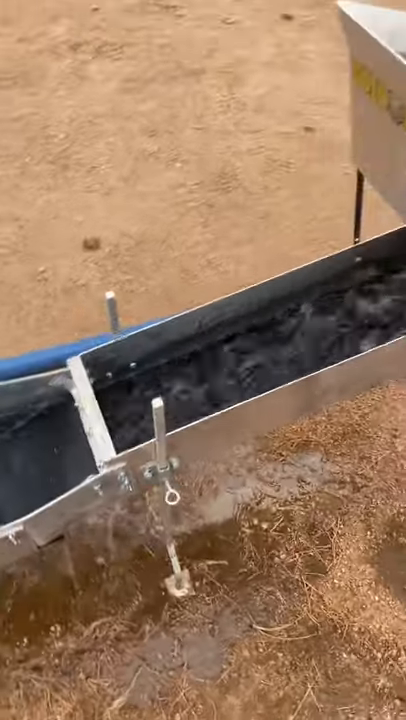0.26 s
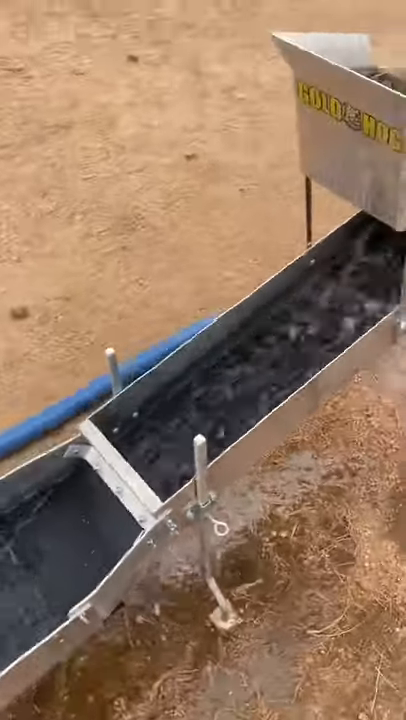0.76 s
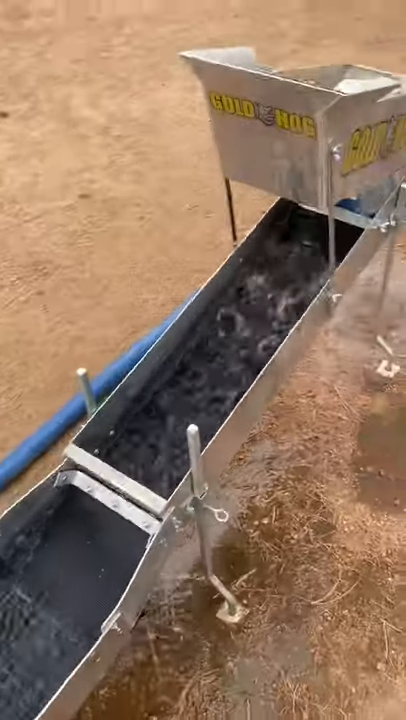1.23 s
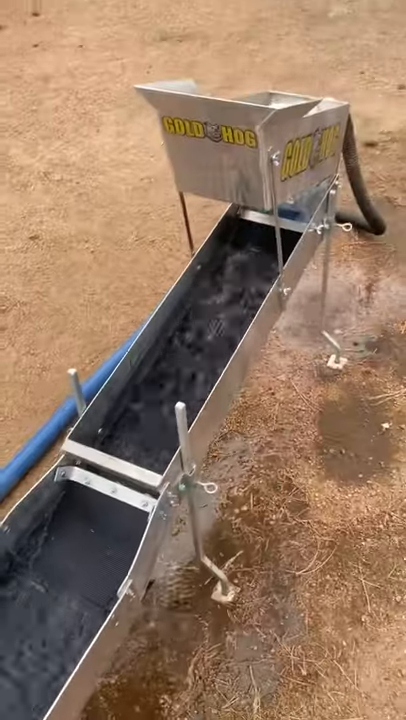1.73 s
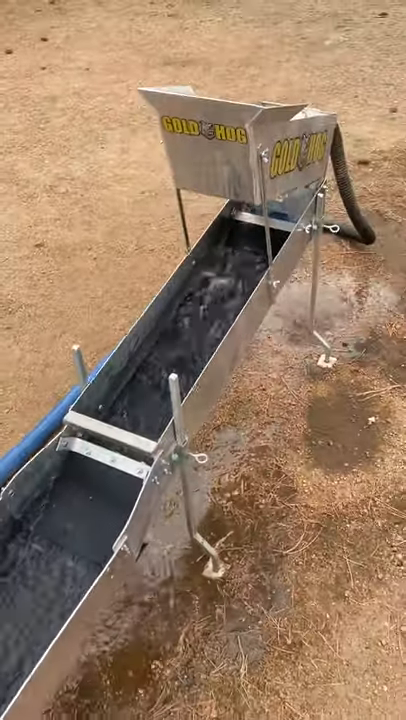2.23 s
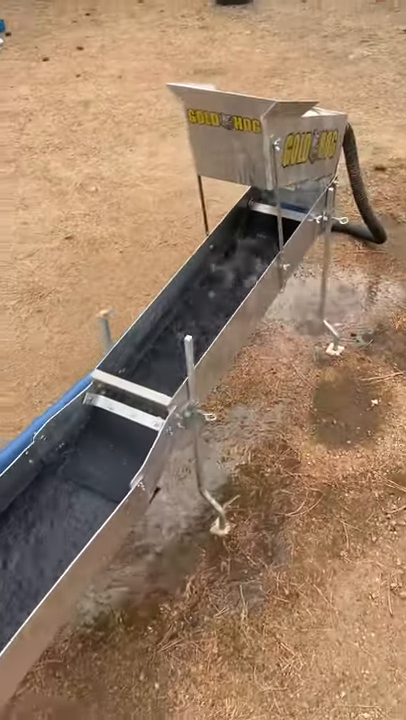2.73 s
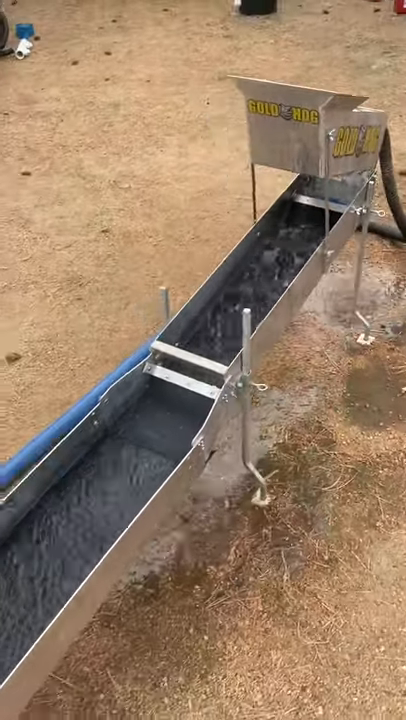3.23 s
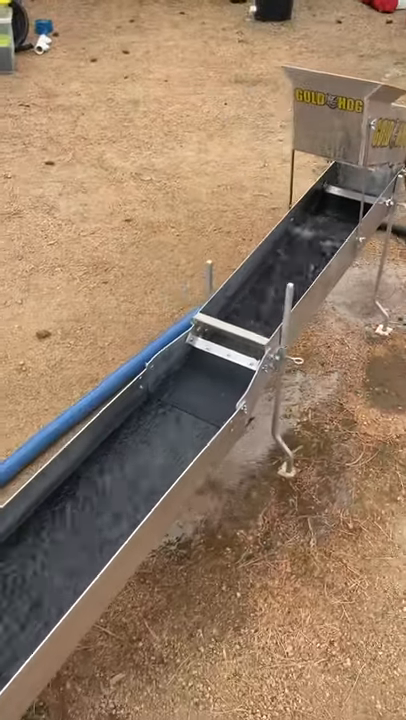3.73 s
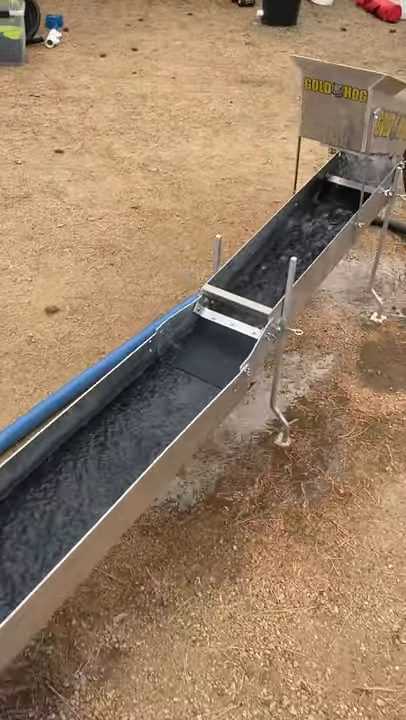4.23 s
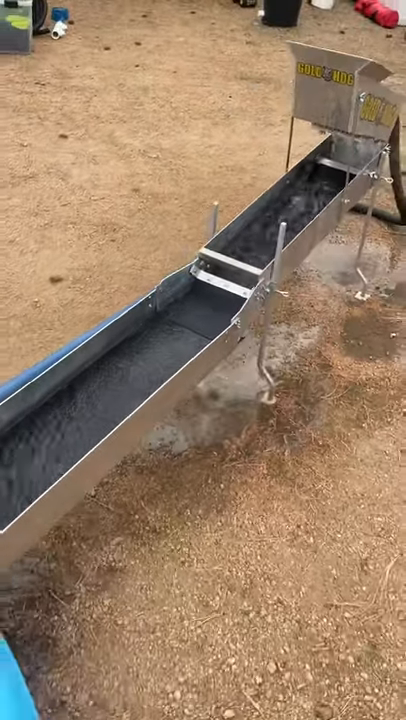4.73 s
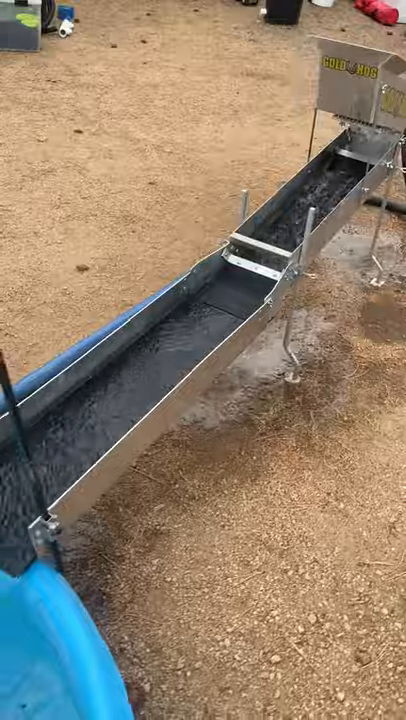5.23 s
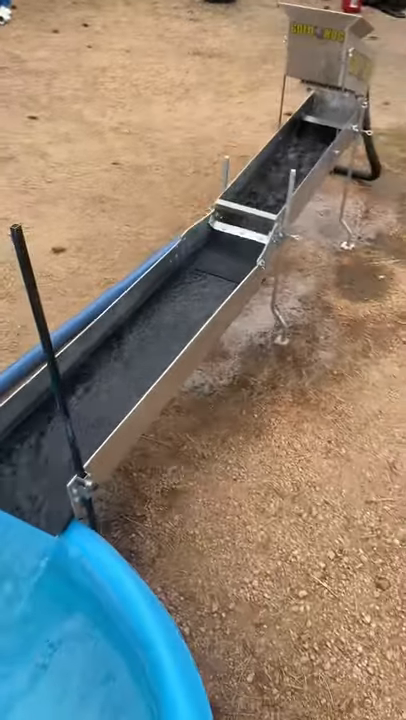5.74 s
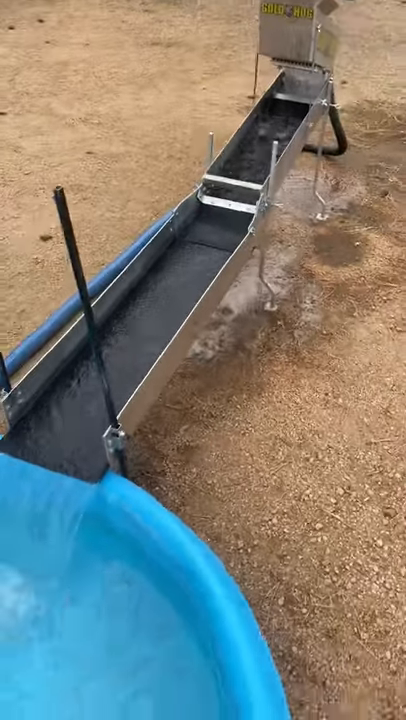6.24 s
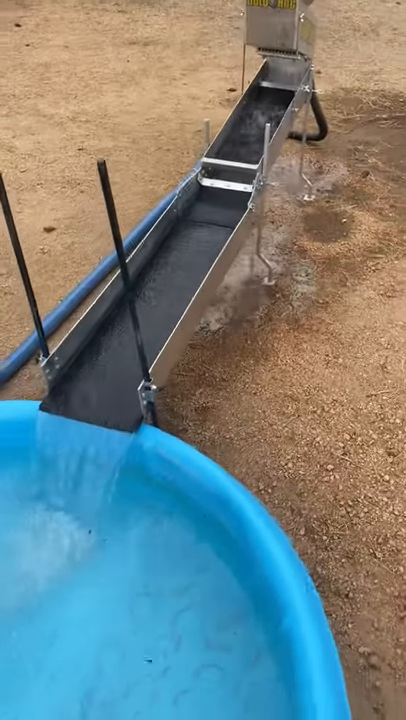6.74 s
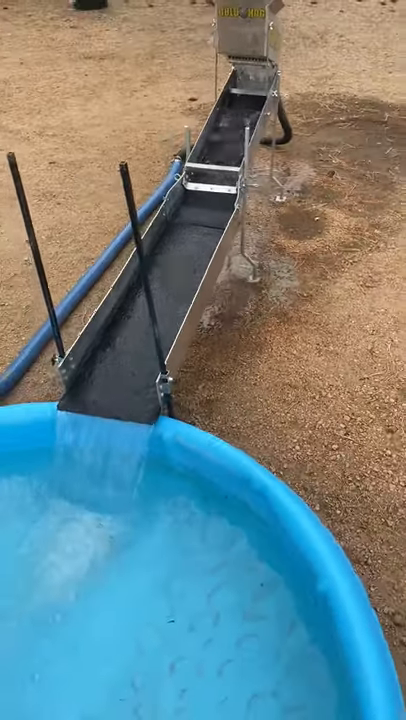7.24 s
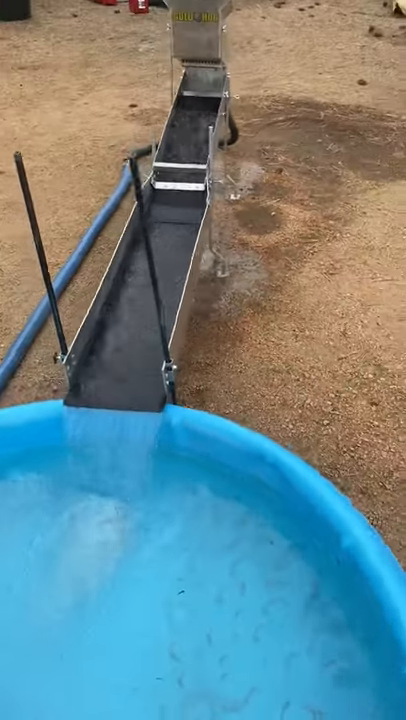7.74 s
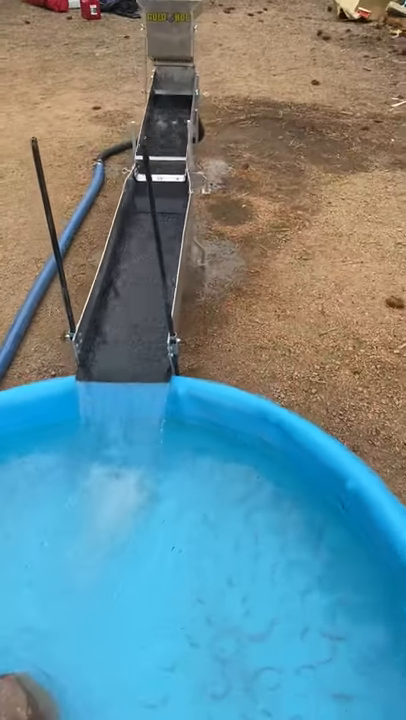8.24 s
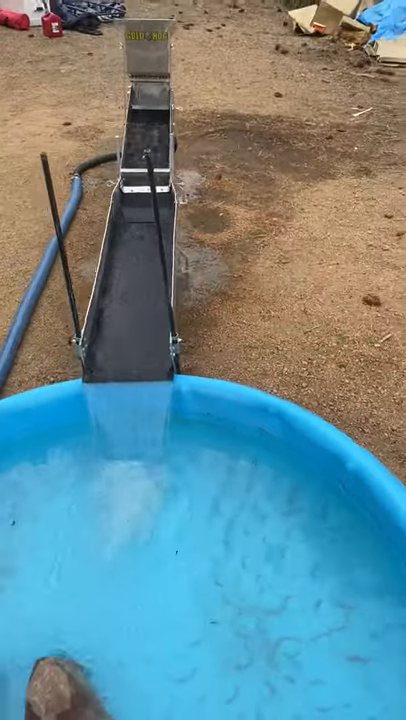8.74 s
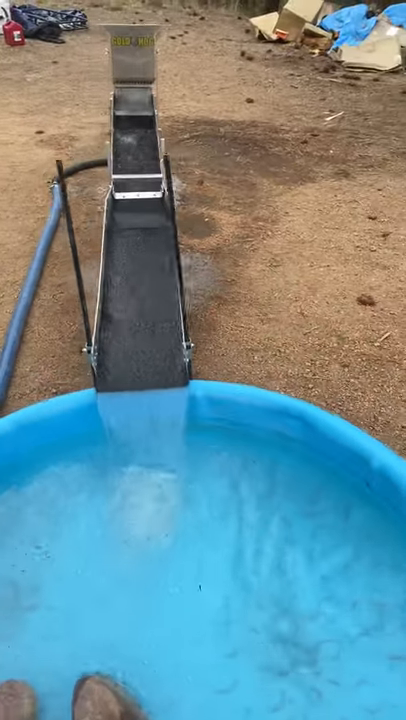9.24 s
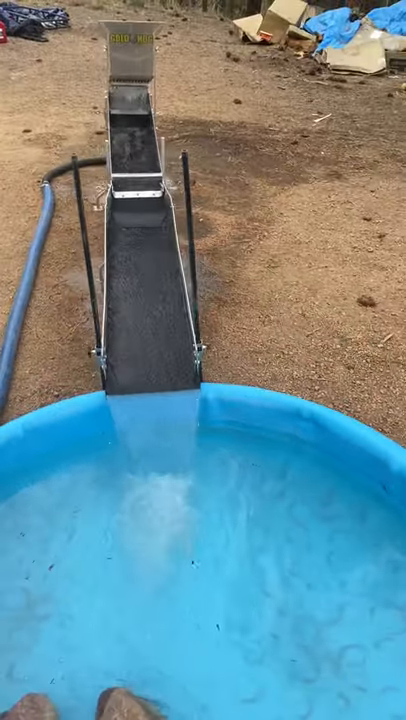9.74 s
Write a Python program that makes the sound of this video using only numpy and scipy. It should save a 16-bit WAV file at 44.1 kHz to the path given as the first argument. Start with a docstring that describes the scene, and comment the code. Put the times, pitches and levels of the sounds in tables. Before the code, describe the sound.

A frothy, continuous stream of running water with droplet patter and low wind thumps, while a steady pump whine slowly emerges toward the end.

```python
"""Water from hopper to pool

A pump sprays water into a metal hopper; it runs down a sluice and pours into a paddling pool.
The listener walks from hopper to pool, where the pump's whine, a slowly sagging tone, grows clearer.
The rush is a froth of decaying bubble tones and noise, coloured by place; single bubbles plink out of it.
A breeze rumbles as filtered noise and buffets the microphone with low, ringing knocks.
"""
import sys
import numpy as np
from scipy import signal
from scipy.fft import rfft, irfft, next_fast_len
from scipy.io import wavfile
from scipy.ndimage import uniform_filter1d

SR = 44100
rng = np.random.default_rng(int(sys.argv[2]) if len(sys.argv) > 2 else 0)


def to_wav(sig):
    """Store sig (one row per channel, or 1-D mono) as 16-bit WAV at the path in sys.argv[1].

    Samples outside -1..1 are clipped; the rate is SR.
    """
    pcm = np.clip(np.atleast_2d(sig), -1, 1) * 32767
    pcm = np.round(pcm).astype(np.int16)
    wavfile.write(sys.argv[1], SR, pcm.T)  # frames by channels


N = 440111  # length in samples


def amp(db):
    """Level law: decibels to an amplitude ratio."""
    return 10 ** (np.asarray(db) / 20)


def unit(x):
    """Power normalisation: scales to rms 1."""
    return x / np.sqrt(np.mean(x ** 2) + 1e-20)


def colour(points, hz, axis=1):
    """Spectral envelope: reads one column of a table on a log-frequency axis."""
    columns = np.transpose(points)
    return np.interp(np.log(hz + 1), np.log(columns[0] + 1), columns[axis])


def follow(rows, t):
    """Time envelope: reads every column of a curve at the times t by linear interpolation."""
    s, *columns = np.transpose(rows)
    return [np.interp(t, s, c) for c in columns]


def add(mix, s, sound):
    """Superposition: adds a sound to the mix at time s."""
    part = mix[..., max(round(s * SR), 0):][..., :sound.shape[-1]]
    part += sound[..., :part.shape[-1]]


def drift(shape, size):
    """Slow fluctuation: a random field of rms 1, smoothed over size = (rows, columns)."""
    field = uniform_filter1d(rng.standard_normal(shape), size[0], axis=0)
    return unit(uniform_filter1d(field, size[1], axis=1, mode="wrap"))


def swells(rows, t):
    """Level modulation: the sum of bell-shaped rises and dips in dB."""
    return sum(db * np.exp(-(2 * (t - middle) / length) ** 2) for middle, length, db in rows)


def bubble(hz, t60, rise=.08, onset=0.00029):
    """Bubble resonance: trapped air rings and decays, its pitch rising as it nears the surface."""
    t = np.arange(int(t60 * SR) + 8) / SR
    tone = np.sin(2 * np.pi * hz * t * (1 + rise * t / t60))
    decay = np.exp(-np.log(1000) * t / t60)
    return tone * decay * (1 - np.exp(-t / onset))


def froth(per_s, spread_db, cycles, wash_db):
    """Incoherent summation: countless bubbles of all sizes over a smooth wash, rows mid and side."""
    out = np.zeros((2, N))
    pitches = 250 + 7200 * np.linspace(0, 1, 64) ** 1.5
    for hz, spacing in zip(pitches, np.gradient(pitches)):
        ring = bubble(hz, cycles * rng.uniform(0.66, 1.52) / np.sqrt(hz * 1000))
        draws = rng.random((int(per_s * N / SR / len(pitches)), 3))
        size = amp(spread_db * np.minimum(-np.log(1 - draws[:, 0]), 4))
        # equal power per Hz keeps the froth flat in colour
        power_share = spacing / np.ptp(pitches)
        size *= np.sqrt(N * power_share / np.sum(size ** 2) / np.sum(ring ** 2))
        at = (draws[:, 1] * N).astype(int)[:, None] + np.arange(len(ring))
        angle = 2 * np.pi * draws[:, 2]
        for row, share in zip(out, (np.cos(angle), np.sin(angle))):
            row += np.bincount(at.ravel(), np.outer(size * share, ring).ravel(), N)[:N]
    return unit(out) + amp(wash_db) * rng.standard_normal((2, N))


# the walk: [t/s, place: 0 hopper, 1 beside the sluice, 2 riffles, 3 lower trough, 4 pool]
WALK_PATH = [(0, 0), (1.1, 0.5), (2.0, 1.5), (2.8, 2), (4.15, 2.5), (4.8, 3), (5.9, 3), (7.0, 4), (10, 4)]
# colour of the water at each place: [f/Hz, relative mid level/dB, relative side level/dB]
HOPPER_COLOUR = [(100, 9, -10), (300, -5, 9.5), (440, 3.5, 9), (514, -6.5, 15), (644, 8.5, 5),
                 (770, -5.5, 11), (1040, 1.5, 9), (1250, -9.5, -1.5), (1480, -1, -4), (1900, -7, -13.5),
                 (2500, -6, -15), (3170, -13.5, -11.5), (3900, -24.5, -15.5), (5200, -16.5, -17.5)]
SLUICE_COLOUR = [(100, -5, -10.5), (230, 0, 3.5), (290, -3, 10.5), (355, -10, 5), (426, 2, 5.5),
                 (515, -10, 4), (635, -1.5, 5.5), (760, -8, 5), (855, -1.5, 8), (940, -9.5, 3.5),
                 (1250, -4, -6), (1450, -1.5, -8.5), (2060, -5, -13), (2720, -8.5, -11), (3020, -14, -15),
                 (3800, -17, -20), (5330, -17.5, -17.5)]
RIFFLES_COLOUR = [(100, -9, -11.5), (290, -4, 6.5), (360, -4.5, 5.5), (440, -3, 4), (515, -7.5, 5.2),
                  (630, -5, 4.5), (730, -10, 1.8), (835, -3, 4), (1000, -9.5, -0.4), (1200, -6, -8.1),
                  (1410, -3, -6.8), (1600, -7, -11.5), (1900, -4, -15), (2550, -6, -11), (3050, -16, -14.5),
                  (3900, -20, -19.5), (4930, -17, -18.9), (5900, -18, -18)]
TROUGH_COLOUR = [(100, -4, -9.5), (230, -1.5, -0.5), (300, -1, 7.5), (422, -3, 5), (507, -13.5, 4),
                 (620, 4, 10), (790, -9.5, 4.5), (850, -5.5, 1.5), (990, -8.5, -1), (1270, -7, -9.5),
                 (1450, -5, -10), (1920, -2.5, -12.5), (2520, -9, -14.5), (3020, -14.5, -15.5),
                 (3800, -17.5, -18), (5330, -18, -17)]
POOL_COLOUR = [(100, 6, -8), (230, -1, 0), (296, -3, 4), (373, -6.5, 2.5), (484, -8, 6.5), (596, 1, 7.5),
               (693, 2, 7.5), (770, -4.5, 4.5), (864, -0.5, 4), (990, -11, 1.5), (1100, -2.5, -1),
               (1650, -8, -15), (1790, -4, -13.5), (2460, -10.5, -17), (3020, -15, -17),
               (4000, -19.5, -19.5), (5230, -21, -20.5)]
# balance between the ears: [f/Hz, left minus right gain/dB]
EAR_BALANCE = [(260, 3), (420, 2.2), (570, -2), (660, -2.4), (750, 0), (810, -0.2), (1050, -0.2),
               (1250, 4.5), (1400, 1), (2000, -1.3), (2550, 2.6), (3100, -.3), (3800, -5), (4700, 0),
               (5400, 1), (6300, -1.3), (6900, 1.5)]
# phase between the ears: [f/Hz, share of the side a quarter cycle ahead of the mid (negative: behind)]
EAR_PHASE = [(220, .45), (320, -0.9), (400, -0.99), (670, -.85), (900, -.75), (1020, -.45), (1200, 0.34),
             (1450, .05), (1900, .32), (2300, -.55), (3200, -.05), (4200, -.2), (5600, .33), (6300, 0)]
# band of the spray's hiss that shifts with the listening angle: [t/s, centre f/Hz, lift level/dB]
SHEEN_BAND = [(0, 4670, 2), (.65, 5570, 4), (1.3, 5580, -4.5), (2.3, 5580, -0.5), (4, 6250, 2),
              (4.5, 5200, 1.5), (4.8, 4840, 7), (5.3, 4760, 6), (5.8, 4950, 4), (10, 4450, 2)]
# passing bands of the water's colour, briefly lifted or dipped: # [middle t/s, length t/s, f/Hz, width f/Hz,
# lift level/dB]
PASSING_BANDS = [(.55, .5, 5330, 130, 4.5), (1.23, .22, 4160, 130, 7), (1.368, 0.25, 2000, 130, 7.5),
                 (2.3, .3, 2560, 130, 1), (3.0, 0.66, 5920, 120, 2.5), (4.25, .3, 2020, 130, 1),
                 (5.05, .4, 4950, 120, 5), (5.5, .3, 2320, 110, 3), (6.748, 0.26, 3150, 130, -0.5),
                 (6.8, .35, 5000, 160, 5), (8.65, .3, 2000, 130, 5), (8.82, .2, 2700, 110, 1)]
# rush of the water before trim and flicker, one entry for each place: [level/dB]
RUSH_LEVELS = [-48.5, -50.5, -50.5, -50.5, -50]
# hiss of the spray before flicker, weaker away from the hopper: [t/s, level/dB]
HISS_LEVEL = [(0, -55.5), (1.05, -59.5), (1.3, -58.5), (3.0, -61), (4.5, -62.5), (4.8, -58), (5.5, -60.5),
              (5.9, -61), (8.4, -64.5), (10, -62.5)]
# surges of the flow: [middle t/s, length t/s, lift level/dB]
FLOW_SURGES = [(1.38, 0.38, 2), (2.3, 0.26, 1.3), (4.25, 0.19, 2.5), (8.85, 0.24, 1)]


def water_colour(hz, t, place, sheen_width_hz=400, ripple_db=1.8):
    """Spectral filtering: mid and side colours in dB blend from place to place, with moving bands."""
    nearness = np.maximum(1 - abs(place - np.arange(5)[:, None]), 0)
    places = (HOPPER_COLOUR, SLUICE_COLOUR, RIFFLES_COLOUR, TROUGH_COLOUR, POOL_COLOUR)
    shape = np.array([np.transpose([colour(c, hz, axis=k) for c in places]) @ nearness for k in (1, 2)])
    sheen_hz, lift = follow(SHEEN_BAND, t)
    shape[0] += lift * np.exp(-.5 * ((hz[:, None] - sheen_hz) / sheen_width_hz) ** 2)
    for middle, length, centre_hz, width_hz, db in PASSING_BANDS:
        band = np.exp(-.5 * ((hz[:, None] - centre_hz) / width_hz) ** 2)
        shape += band * swells([(middle, length, db)], t)
    # reflections off the trough and the ground lay slowly shifting ripples on the colour
    ripple = colour([(500, 0.64), (2500, 1.0)], hz)[:, None] * drift(shape[0].shape, size=(3, 420))
    return shape + ripple_db * ripple


def water(rush_db=-0.73, hiss_db=0., patchy_db=0.87, splash_db=0.9, spit_db=1., slosh_db=.5):
    """Time-varying filtering: froth takes the colour of the nearest places and splashes unevenly."""
    frame, hop = 512, 128  # samples
    source = froth(per_s=3600, spread_db=3., cycles=33.2, wash_db=5.0)
    hz, t, z = signal.stft(source, SR, nperseg=frame, noverlap=frame - hop)
    place, = follow(WALK_PATH, t)
    shape = water_colour(hz, t, place)
    low, high = (hz > 500) & (hz < 2800), (hz > 3500) & (hz < 7000)
    # 4/3: two-sided spectrum (2) over the window's noise bandwidth (1.5 bins)
    z = z / np.sqrt(np.mean(abs(z[:, low | high]) ** 2) * 4 / 3)
    skew = np.clip(colour(EAR_PHASE, hz), -1, 1)[:, None]
    z = np.array([z[0], 1j * skew * z[0] + np.sqrt(1 - skew ** 2) * z[1]])

    # one uneven flow drives both the rush and the hiss
    flow = swells(FLOW_SURGES, t) + slosh_db * drift((1, len(t)), size=(1, 70))[0]
    low_db = 10 * np.log10(np.sum(amp(shape[0, low]) ** 2, 0))
    high_db = 10 * np.log10(np.sum(amp(shape[0, high]) ** 2, 0))
    rush = np.interp(place, np.arange(len(RUSH_LEVELS)), RUSH_LEVELS) + flow + rush_db - low_db
    hiss = follow(HISS_LEVEL, t)[0] + flow + hiss_db - high_db
    spray = colour([(2400, 0.084), (3800, 0.94)], hz)[:, None]  # share of hiss at each frequency

    # splashes lift wide bands at once; the spray also spits in short bursts
    flicker = patchy_db * drift(shape[0].shape, size=(9, 12))
    flicker += splash_db * drift(shape[0].shape, size=(60, 7))
    spits = np.minimum(rng.exponential(1, len(t)), 7) - 1
    flicker += spit_db * (0.27 + 1.0 * spray) * spits
    mid, side = z * amp(shape + (1 - spray) * rush + spray * hiss + flicker)
    lean = amp(colour(EAR_BALANCE, hz) / 2)[:, None]
    ears = np.array([(mid + side) * lean, (mid - side) / lean])
    return signal.istft(ears, SR, nperseg=frame, noverlap=frame - hop)[1][:, :N]


def trickle(per_s=60, level_db=-46, spread_db=2.5, centre_hz=1700, cycles=24):
    """Damped oscillation: small droplets patter on running water, each a very short blip."""
    out = np.zeros((2, N))
    for when, pitch, size, side in rng.random((int(per_s * N / SR), 4)):
        hz = centre_hz * 2 ** (1.4 * (pitch - .5))
        level = amp(level_db + spread_db * min(-np.log(size), 3.5))
        blip = bubble(hz, cycles / hz, onset=.0003) * level
        add(out, when * N / SR, np.outer(np.sqrt([side, 1 - side]), blip))
    return out


def gurgles(per_s=20, level_db=-53, spread_db=2, centre_hz=640, t60=0.056):
    """Volume resonance: larger bubbles glug where water folds over the riffles and enters the pool."""
    out = np.zeros((2, N))
    for when, pitch, size, side in rng.random((int(per_s * N / SR), 4)):
        level = amp(level_db + spread_db * min(-np.log(size), 3))
        glug = bubble(centre_hz * 2 ** (1.3 * (pitch - .5)), t60, onset=0.0048) * level
        angle = np.pi * (0.49 + .6 * side)  # mostly out of step between the ears
        add(out, when ** .7 * N / SR, np.outer([np.cos(angle), np.sin(angle)], glug))  # more often near the pool
    return out


def spatter(per_s=6, level_db=-45, spread_db=2.5):
    """Impact excitation: stray droplets tick on metal and wet ground, more of them near the hopper."""
    out = np.zeros((2, N))
    for when, pitch, size, side in rng.random((int(per_s * N / SR), 4)):
        level = amp(level_db + spread_db * min(-np.log(size), 4))
        tick = bubble(2800 + 3800 * pitch, t60=0.0054, onset=.0001) * level
        add(out, when ** 1.1 * N / SR, np.outer(np.sqrt([side, 1 - side]), tick))
    return out


# whine along the walk, before gain and waver:
# [t/s, left relative level/dB, right relative level/dB, left-ear phase lead/rad]
WHINE_LEVELS = [(0.1, -57, -57, -2), (0.35, -66, -62, -1.5), (0.9, -65, -59, -1), (1.15, -58, -66, -1.9),
                (1.42, -50, -65, -3.5), (1.8, -58.5, -67, -2.5), (2.65, -55, -63, -3), (3.15, -64, -61, -2),
                (3.42, -54, -68, -2), (3.9, -55.5, -60, -1.5), (4.15, -61, -64, -0.5),
                (4.4, -58, -55.5, -3), (4.75, -63, -55, -2.5), (5.1, -56.5, -52.5, -1.2),
                (5.7, -55, -57.5, 0.3), (5.9, -53.5, -63.5, 2), (6.3, -48.5, -62, 1.5),
                (6.65, -55.5, -59, 2), (7.0, -49.5, -64, 1.5), (7.6, -50, -52.5, 1), (8.2, -50.5, -57.5, 2),
                (8.7, -48, -56, 0.9), (8.92, -54.5, -60, .5), (9.05, -47, -53.5, 1.5),
                (9.9, -50.5, -52.5, 1.5)]


def pump(level_db=1., waver=0.13, wobble=0.077):
    """Interference: echoes off ground and rig make one motor tone swell and fade in each ear."""
    pump_hz, sag_hz_per_s = 1096.6, .43
    t = np.arange(N) / SR
    left_db, right_db, lead = follow(WHINE_LEVELS, t)
    turn = 2 * np.pi * np.cumsum(pump_hz - sag_hz_per_s * t) / SR
    turn = turn + wobble * drift((2, N), size=(1, 2000))
    tone = np.array([amp(left_db) * np.sin(turn[0]), amp(right_db) * np.sin(turn[1] - lead)])
    # sqrt(2) makes the levels rms
    return np.sqrt(2) * amp(level_db) * tone * (1 + waver * drift((2, N), size=(1, 1500)))


# gusts: [start t/s, length t/s, nominal lift level/dB]
WIND_GUSTS = [(0.09, 0.33, 6), (0.46, 0.14, 5.5), (0.673, 0.13, 6), (0.954, 0.11, 10.5), (1.17, 0.49, 6),
              (1.384, 0.087, 7), (1.8, .16, 3), (2.21, 0.23, 5), (2.88, .25, 6), (3.26, 0.28, 5.5),
              (3.616, 0.24, 10.5), (4.52, 0.11, 7), (4.767, 0.085, 7), (6.004, 0.17, 5),
              (6.335, 0.53, 11.5), (6.7, 0.26, 2), (7.228, 0.14, 12), (7.574, .16, 5.5), (8.099, 0.54, 8),
              (9.132, 0.45, 6.5), (9.585, 0.23, 6)]


def gusts(t, rise_s=0.042, ebb=1.28):
    """Transient envelope: each gust lifts the level in dB quickly and falls back over its length."""
    lift = 0
    for start, length, db in WIND_GUSTS:
        rise = np.clip((t - start) / rise_s, 0, 1)
        fall = 1 - np.clip((t - start) / length, 0, 1) ** ebb
        lift = lift + db * rise * fall
    return lift


# spectrum of the wind's rumble: [f/Hz, relative level/dB]
WIND_COLOUR = [(15, -47), (25, -26), (39, -10), (47, -15.5), (56, 0.5), (63, -8.5), (78, -16), (100, -25.5),
               (150, -37), (250, -58), (400, -77), (1200, -130)]
# brief dips in the rumble's uneven level: [middle t/s, length t/s, lift level/dB]
RUMBLE_DIPS = [(.05, 0.083, -3.5), (.41, .05, -7), (1.11, 0.04, -7), (1.7, 0.16, -1.5), (2.67, 0.07, -11),
               (2.88, .04, -8), (3.245, 0.066, -15), (3.6, 0.037, -18), (3.92, 0.16, -4.5),
               (4.44, 0.054, -8.5), (5.62, 0.18, -1), (5.92, 0.03, -11), (6.65, 0.027, -11),
               (7.15, 0.035, -9), (7.84, 0.13, -7), (8.07, 0.076, -10), (8.77, 0.031, -14),
               (8.95, 0.075, -4), (9.915, 0.1, -9.5)]


def breeze(level_db=-32.5, evenness=0.8, lumpy_db=1.5):
    """Turbulence noise: a narrow, humming rumble at the microphone swells with the gusts."""
    t, hz = np.arange(N) / SR, np.fft.rfftfreq(N, 1 / SR)
    air = unit(irfft(rfft(rng.standard_normal(N)) * amp(colour(WIND_COLOUR, hz)), N))
    # dividing by its own envelope evens out the narrow band's fluctuation
    power = uniform_filter1d(uniform_filter1d(air ** 2, size=3000), size=1500)
    envelope = np.sqrt(power + 1e-3)
    lumps = unit(uniform_filter1d(drift((1, N), size=(1, 3200))[0], size=1500))
    db = level_db + gusts(t) + swells(RUMBLE_DIPS, t) + lumpy_db * lumps
    return amp(db) * unit(air / envelope ** np.clip(evenness, 0, 1))


# splashes and spits of spray:
# [t/s, starting rms level/dB, centre f/Hz, 60 dB decay t/s, bell half-width (sigma)/octave]
SPRAY_SPLASHES = [(.126, -47, 4800, .025, 0.18), (.626, -46, 5200, .025, .35), (.647, -48, 5200, .02, .2),
                  (0.712, -50, 4360, 0.017, .1), (1.362, -48, 4200, .03, .5), (2.049, -48, 4500, .02, .4),
                  (2.33, -43, 1600, .08, 0.39), (2.351, -46, 4000, .02, 0.37), (2.76, -48, 5200, .02, .4),
                  (3.051, -45, 4800, 0.031, .4), (3.16, -47, 1700, .03, .5), (3.275, -48, 3900, 0.026, .12),
                  (3.713, -49, 3200, .02, .2), (4.21, -48, 5500, .03, .08),
                  (4.3045, -40, 1500, 0.045, 0.61), (4.306, -40.5, 500, 0.064, 0.56),
                  (4.735, -52, 4800, .02, .3), (4.8, -50, 4300, 0.016, .4), (6.066, -48, 4560, .02, .2),
                  (6.549, -50, 4500, .02, .3), (6.958, -42, 1500, 0.052, .45), (7.077, -44, 3250, .02, .1),
                  (7.657, -46, 4160, 0.016, 0.32), (9.657, -47, 6100, 0.018, .45)]


def splashes(level_db=0.):
    """Band-limited noise: a slop of water bursts into a short, exponentially decaying spray."""
    out, t = np.zeros((2, N)), np.arange(16384) / SR
    hz = np.fft.rfftfreq(len(t), 1 / SR)
    for s, db, centre, t60, octaves in SPRAY_SPLASHES:
        band = np.exp(-.5 * (np.log2((hz + 1) / centre) / octaves) ** 2)
        # one part common to both ears, one part separate
        noise = rng.standard_normal(len(t)) + 1.1 * rng.standard_normal((2, len(t)))
        burst = unit(irfft(rfft(noise) * band))
        add(out, s, amp(db + level_db) * burst * np.exp(-np.log(1000) * t / t60))
    return out


# wind pushes: [peak t/s, peak level/dB, nominal f/Hz of the push]
WIND_BUFFETS = [(0.161, -23.5, 114), (.197, -33, 105), (0.637, -33.5, 105), (0.77, -20, 141),
                (.961, -24.5, 139), (.983, -27.5, 105), (1.084, -26, 132), (1.17, -27.5, 144),
                (1.435, -30.5, 126), (1.583, -32, 150), (1.751, -29, 160), (1.8, -25, 100),
                (1.888, -29.5, 138), (2.232, -23, 115), (2.269, -28, 116), (2.388, -28, 117),
                (2.573, -27, 121), (3.379, -31.5, 124), (3.443, -25, 120), (3.46, -27, 105),
                (3.574, -35, 110), (3.645, -20.5, 124), (3.728, -21.5, 128), (4.122, -21.5, 242),
                (4.126, -17, 137), (4.167, -31, 117), (4.191, -33, 110), (4.237, -29, 110),
                (4.56, -27, 106), (4.796, -29.5, 89), (4.82, -30.5, 130), (5.752, -22, 116),
                (5.817, -30, 125), (5.872, -28.5, 111), (6.038, -21, 268), (6.045, -21, 91),
                (6.273, -18.5, 101), (6.377, -19.5, 114), (6.394, -25.5, 260), (6.4, -18, 100),
                (6.543, -27, 105), (6.67, -28, 100), (6.693, -25, 100), (6.719, -18, 110),
                (6.739, -26.5, 149), (6.863, -27.5, 110), (6.888, -21.5, 96), (7.279, -15, 109),
                (7.313, -17.5, 109), (7.33, -23.5, 105), (7.991, -30.5, 110), (8.226, -33, 100),
                (8.53, -31, 100), (9.246, -26.5, 108), (9.318, -26.5, 115), (9.343, -24, 138),
                (9.361, -20.5, 118), (9.396, -15, 118), (9.43, -23, 95), (9.625, -16, 128),
                (9.715, -25, 123), (9.967, -25, 260), (9.974, -17.5, 117)]


def buffets(level_db=0., cut_hz=58, sharpness=1.74):
    """Impulse response: an eddy's push meets the microphone's bass cut and becomes a ringing knock."""
    out, t = np.zeros(N), np.arange(7000) / SR
    bass_cut = signal.cheby1(4, 1, cut_hz, "highpass", fs=SR, output="sos")
    for s, db, hz in WIND_BUFFETS:
        u = 2 * np.pi * hz * sharpness * t
        push = u ** 6 * np.exp(-u)
        knock = signal.sosfilt(bass_cut, push)
        peak_s = t[np.argmax(abs(knock))]
        add(out, s - peak_s, amp(db + level_db) * knock / abs(knock).max() * rng.choice([-1, 1]))
    return out


# single drops: [t/s, level/dB before onset and decay, starting f/Hz, 60 dB decay t/s, left minus right level/dB]
SINGLE_DROPS = [(1.57, -41.5, 500, 0.081, -3), (2.065, -30, 1830, 0.009, -3),
                (2.232, -37.5, 2630, 0.027, 1), (2.339, -35, 2090, .012, 2), (2.471, -32, 2570, 0.016, 2),
                (4.305, -30, 2290, 0.0081, 2), (4.628, -31.5, 1830, 0.015, -1), (4.885, -42, 854, 0.09, 1),
                (5.3, -41, 774, 0.065, 0), (6.733, -32.5, 3120, 0.013, 0), (6.872, -27, 1630, 0.018, 4),
                (6.943, -35, 1350, 0.012, 4), (6.956, -34.5, 1240, 0.018, 3.5),
                (6.962, -29, 1720, 0.013, 3.5), (8.836, -35, 2730, 0.018, 1),
                (9.0617, -21.5, 1200, 0.0064, 2.5), (9.102, -22, 1190, 0.0076, 5)]


def drops(level_db=0., left_lag_s=.00005):
    """Bubble resonance: large drops each trap one bubble that stands out of the rush."""
    out = np.zeros((2, N))
    for s, db, hz, t60, left_db in SINGLE_DROPS:
        plink = amp(db + level_db) * bubble(hz, t60, rise=0.074, onset=0.00054)
        add(out[0], s + left_lag_s, amp(left_db / 2) * plink)
        add(out[1], s, amp(-left_db / 2) * plink)
    return out


def scene():
    """Superposition: water and pump spread wide; the wind is alike in both ears."""
    wet = water() + trickle() + gurgles() + spatter() + splashes() + drops()
    return wet + pump() + breeze() + buffets()


# the recorder's dull top: [f/Hz, gain level/dB]
TREBLE_FADE = [(5300, 0.5), (6000, -3), (6400, -7), (6800, -13.5), (7500, -23.5), (8200, -49.5)]


def record(dry, edge_hz=7900):
    """Low-pass filtering: the recorder's treble fades out, then ends at a steep band limit."""
    size = next_fast_len(2 * N, True)
    gain = amp(colour(TREBLE_FADE, np.fft.rfftfreq(size, 1 / SR)))
    dull = irfft(rfft(dry, size) * gain, size)[:, :N]
    band_limit = signal.firwin(511, edge_hz, window=("kaiser", 9), fs=SR)
    return signal.oaconvolve(dull, band_limit[None], "same")


dry = scene()
out = record(dry)
to_wav(out)
```